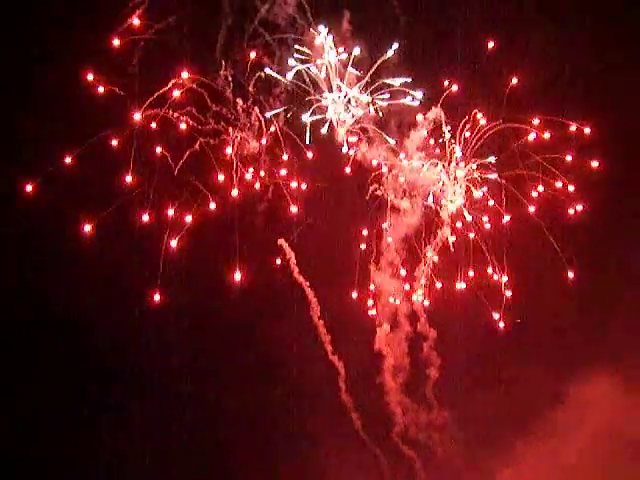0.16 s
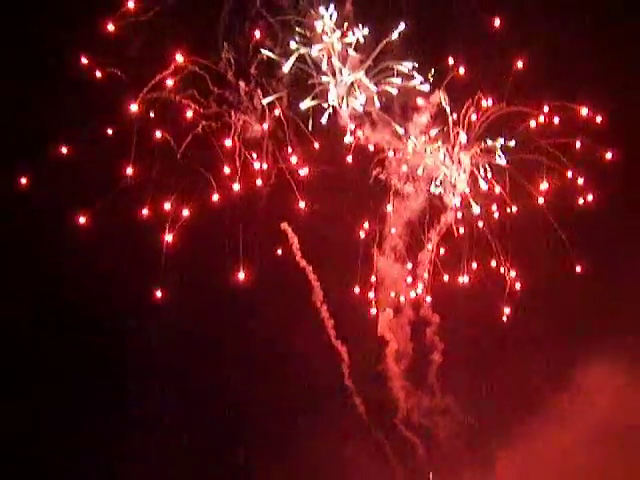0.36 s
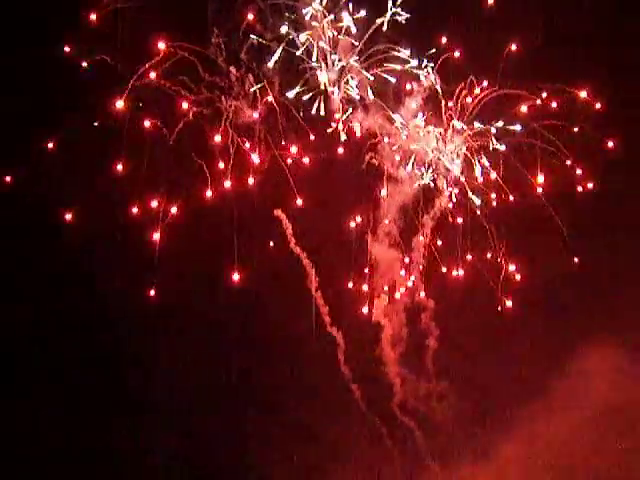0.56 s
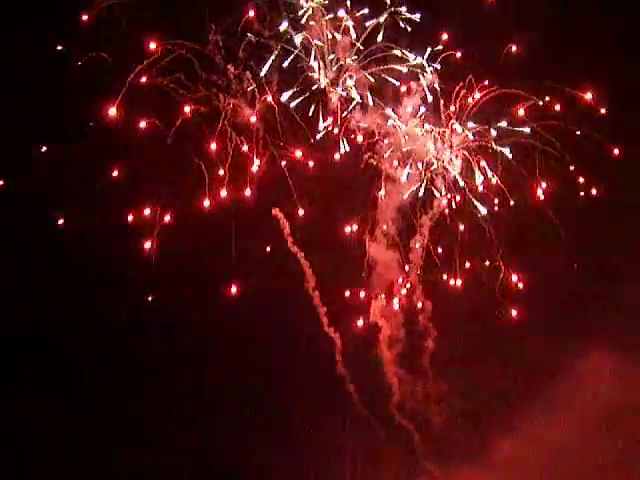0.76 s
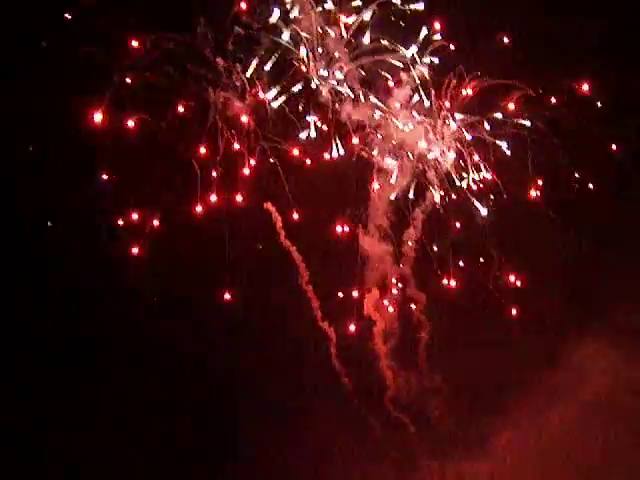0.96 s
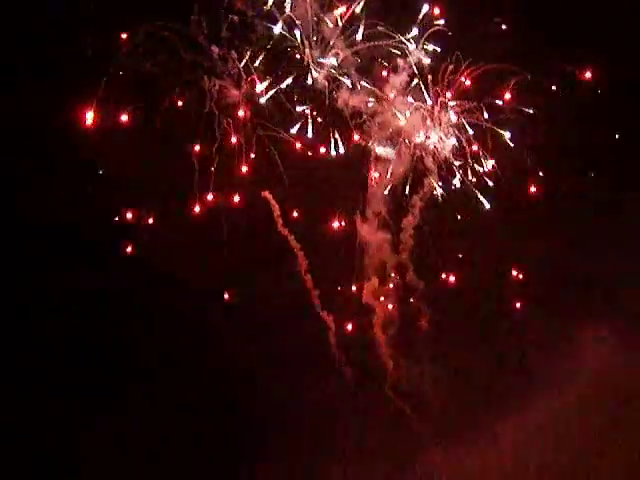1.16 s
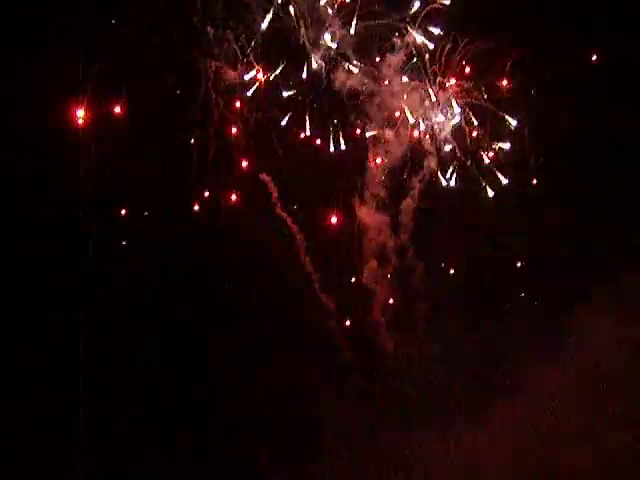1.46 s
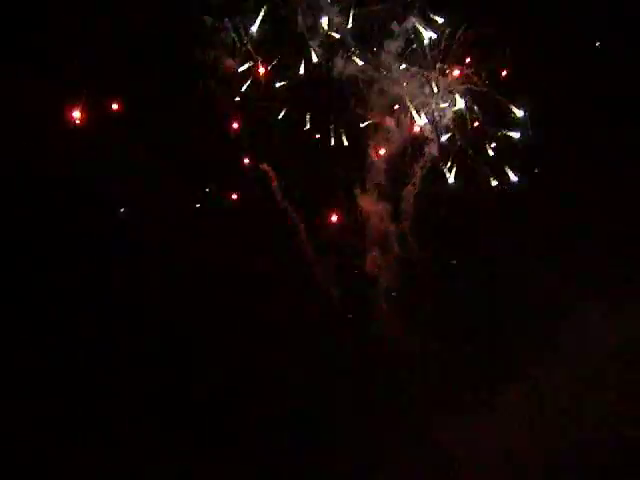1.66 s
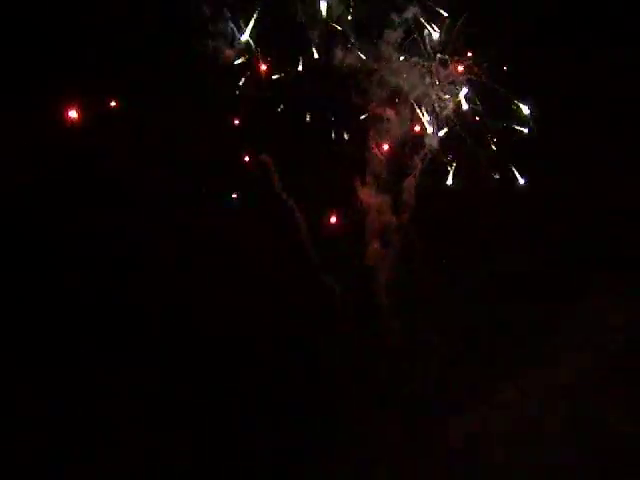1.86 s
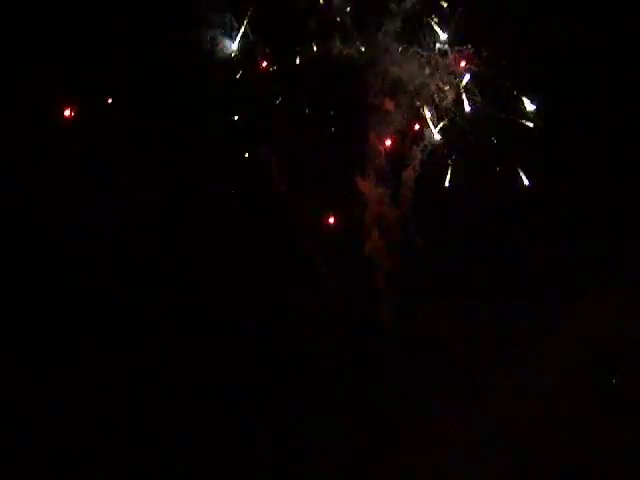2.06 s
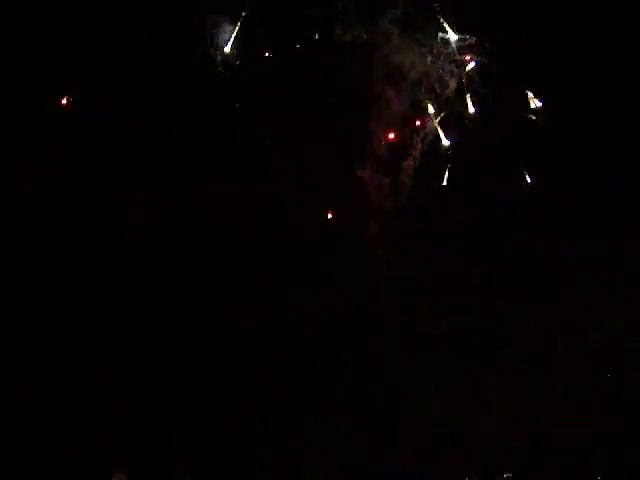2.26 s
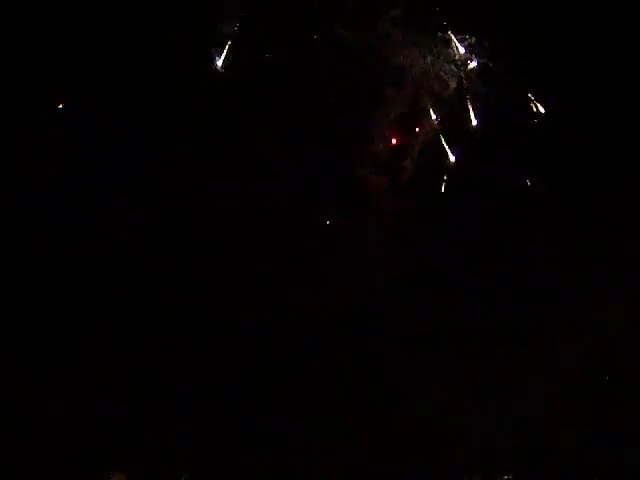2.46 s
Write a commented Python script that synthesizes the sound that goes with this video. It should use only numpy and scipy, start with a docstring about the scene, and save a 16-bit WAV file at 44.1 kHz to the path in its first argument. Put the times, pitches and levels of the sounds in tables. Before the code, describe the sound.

Fireworks crackle in sharp overlapping pops at night, with three deep booms, then fade to quiet.

```python
"""Small star charges of a firework pop overhead at night: each is a sudden push of air, then a ground bounce.
Three mortar lifts boom from the ground: a deep swing of pressure under a noisy crack, sent back by walls.
Faint noisy ticks, a low rumble and a far wash of reverberation, all shaped from noise, lie behind them.
A camera hears this through a dull port (left) and a bright one that whistles (right), and overloads."""
import sys
import numpy as np
from scipy import signal
from scipy.io import wavfile
from scipy.ndimage import uniform_filter1d

SR = 44100
rng = np.random.default_rng(int(sys.argv[2]) if len(sys.argv) > 2 else 0)


def put_to_file(sound):
    """Save the sound as 16-bit audio at rate SR, in the file named by the first command-line argument."""
    columns = np.atleast_2d(sound).T  # one column per channel
    safe = np.clip(columns, -1, 1)
    whole_steps = np.round(safe * 32767)
    wavfile.write(sys.argv[1], SR, whole_steps.astype(np.int16))


N = 114660  # length in samples


def amp(db):
    """Turns decibels into a plain multiplier."""
    return 10 ** (np.asarray(db) / 20)


def evened(x):
    """Brings a sound to an average (RMS) strength of 1."""
    return x / np.sqrt(np.mean(x ** 2) + 1e-20)


def read(points, hz):
    """Reads a curve of (pitch_hz, value) points, in straight lines over log pitch."""
    f, value = np.transpose(points)
    return np.interp(np.log(hz + 1), np.log(f + 1), value)


def add(mix, s, sound):
    """Adds a sound to the mix, starting at s seconds."""
    part = mix[round(s * SR):][:len(sound)]
    part += sound[:len(part)]


def coloured(x, points):
    """Filters with a gain curve, without any sound arriving early (minimum phase)."""
    log_gain = read(points, abs(np.fft.fftfreq(4096, 1 / SR))) * np.log(10) / 20
    response = np.exp(np.conj(signal.hilbert(log_gain)))
    taps = np.fft.ifft(response).real[:2048]
    return signal.oaconvolve(x, taps)[:N]


# How alike the background is at the two ports: pitch_hz, likeness (1 = the same)
PORT_LIKENESS = [(100, .98), (400, 1), (1000, 1), (2000, 0.17), (4000, 0.6)]


def murk(tone, level, size, patchy_db, flicker_db):
    """Shapes random short-time spectra with patches and flicker, partly shared by the two ports."""
    frames, hz = N * 4 // size + 5, np.fft.rfftfreq(size, 1 / SR)
    a, b, c, d, patches = rng.standard_normal((frames, len(hz), 5)).T
    patches = uniform_filter1d(patches, size=6, axis=0)
    patches = evened(uniform_filter1d(patches, size=8, axis=1))
    same = np.clip(read(PORT_LIKENESS, hz), -1, 1)[:, None]
    left = a + 1j * b
    right = same * left + np.sqrt(1 - same ** 2) * (c + 1j * d)
    flicker = flicker_db * rng.standard_normal(frames)
    gain = amp(read(tone, hz)[:, None] + patchy_db * patches + flicker)
    spectra = np.array([left, right]) * gain
    x = evened(signal.istft(spectra, nperseg=size, noverlap=size * 3 // 4)[1][:, :N])
    return x * amp(np.interp(np.arange(N) / SR, *np.transpose(level)))


# Loudness of the low rumble over time: time_s, level_db
RUMBLE_LEVEL = [(0, -45), (.36, -39), (.46, -28), (0.519, -22.5), (.6, -20.5), (.7, -26.5), (.9, -35.5),
                (1.0, -39), (1.172, -38.5), (1.36, -29.5), (1.458, -36.5), (1.831, -44), (1.92, -38),
                (2.02, -30), (2.07, -39.5), (2.13, -34), (2.22, -39), (2.27, -39.5), (2.43, -44.5),
                (2.48, -37), (2.6, -40.5)]
# Balance of pitches in the rumble: pitch_hz, relative_level_db
RUMBLE_TONE = [(10, -21), (20, -2.5), (35, -10.5), (60, -5), (95, -11), (125, -21.5), (200, -28)]


def rumble():
    """Low noise that swells, sinks and flickers, cut off steeply towards 300 Hz."""
    return murk(RUMBLE_TONE + [(300, -87)], RUMBLE_LEVEL, size=2048, patchy_db=0, flicker_db=5.5)


# Loudness of the far reverberation of the show: time_s, level_db
WASH_LEVEL = [(0.0, -39), (0.19, -40.5), (0.32, -35.5), (0.45, -36), (0.62, -33), (0.85, -42), (1.01, -33),
              (1.16, -37.5), (1.7, -43.5), (2.6, -45.5)]
# Balance of pitches in the far reverberation: pitch_hz, relative_level_db
WASH_TONE = [(100, -35.5), (200, 4), (400, -4.5), (900, -6.5), (1500, -13.5), (3000, -15), (5000, -15.5),
             (8000, -32)]


def wash():
    """Far reverberation of the show: a broad noise with slight patches and flicker."""
    return murk(WASH_TONE, WASH_LEVEL, size=256, patchy_db=1, flicker_db=1)


TAIL_DB = -22
# How long each pitch lingers in the surroundings: pitch_hz, t60_s (time to fall by 60 dB)
TAIL_T60 = [(150, 0.75), (600, 0.68), (2000, 0.75), (6000, 0.37)]


def surroundings(x):
    """Sparse reflections of random sign, each band dying at its own speed."""
    taps = np.zeros((2, SR // 2))
    jitter = rng.integers(0, 20, (2, (SR // 2 - 261) // 20))
    at = np.arange(260, SR // 2 - 20, 20) + jitter  # one reflection per 20 samples
    np.put_along_axis(taps, at, rng.choice([-1., 1.], at.shape), 1)
    taps[1] += 2.7 * taps[0]  # the right port shares the left port's reflections
    hz, t, z = signal.stft(taps, SR, nperseg=256)
    decay = amp(-60 * t / read(TAIL_T60, hz)[:, None])
    tail = signal.istft(z * decay, SR, nperseg=256)[1]
    tail /= np.linalg.norm(tail, axis=1, keepdims=True)
    return amp(TAIL_DB) * signal.fftconvolve(x[None], tail, axes=1)[:, :N]


# Distant echoes and faint ticks: start_s, level_db, brightness_hz, t60_s
TICKS = [(1.599, -30, 4500, 0.016), (1.752, -37.5, 978, 0.051), (1.885, -29, 910, 0.023),
         (1.894, -33.5, 3330, .03), (1.923, -37.5, 2600, 0.32), (1.955, -31.5, 2600, 0.042),
         (1.977, -41, 2770, .03), (2.004, -33, 2020, 0.014), (2.049, -23, 1570, 0.025),
         (2.052, -28.5, 4300, 0.024), (1.93, -38.5, 495, 0.45), (2.051, -33, 630, 0.12),
         (2.09, -36, 1800, 0.028), (2.271, -28.5, 5170, 0.025), (2.299, -45, 5150, 0.035)]


def ticks():
    """Smeared puffs of noise in a broad band, each rising fast and then dying away."""
    out, t = np.zeros(N), np.arange(3000) / SR
    for (s, db, hz, t60), noise in zip(TICKS, rng.standard_normal((len(TICKS), 3000))):
        sos = signal.butter(2, [hz / 1.6, hz * 1.3], "band", fs=SR, output="sos")
        band = evened(signal.sosfilt(sos, noise))
        rise = np.minimum(t / 0.00069, 1)
        add(out, s, amp(db - 60 * t / t60) * rise * band)
    return out


def shock(ms):
    """A sudden push of air, then a longer suction; ms is the length of the push."""
    u = np.arange(1500) / SR / (ms / 1000)
    return (1 - u) * np.exp(-u)


# Deep swing: DIP_S is its lowest point after the start; rise and fall are its widths before and after that
DIP_S, THUMP_RISE_S, THUMP_FALL_S = .0088, .0095, .0105
THUMP_SAG = 14  # per second: how quickly the swing slows down after the dip
CRACK_T60, LEAD_S, BEAT_HZ, BEAT_T60 = .025, .004, 960, .03  # times in seconds
SNAP_DB, SNAP_MS = 16.5, 0.067  # shock front, against the thump
# Mortar lifts: start_s, thump_db, thump_hz, crack_db, beat_db, lead_in_hiss_db
BOOMS = [(.4130, -.8, 64, -2, -9, -15), (.4406, -.3, 64, -5, -10, -13), (.5279, 1.8, 61, -2, -11, -9)]
# Returns from the surroundings: delay_s, thump_db, crack_db (both against the first sound)
ECHOES = [(.164, -19.5, -47), (0.226, -21.5, -48)]


def booms():
    """One deep swing of pressure under a ragged crack with a 960 Hz tone; a hiss leads in, walls answer."""
    thumps, cracks, t = np.zeros(N), np.zeros(N), np.arange(-1500, 3000) / SR
    grit = rng.standard_normal((len(BOOMS), len(t)))
    u, after = t - DIP_S, np.maximum(t, 0)
    fade_in = np.clip(1 + t / .005, 0, 1) ** 2
    swell = np.exp(-(u / np.where(u < 0, THUMP_RISE_S, THUMP_FALL_S)) ** 2) * fade_in
    for (s, db, hz, crack_db, beat_db, lead_db), noise in zip(BOOMS, grit):
        turns = hz * u * np.exp(-THUMP_SAG * np.maximum(u, 0))
        thump = -amp(db) * swell * np.cos(2 * np.pi * turns)
        lead_in = amp(lead_db) * np.exp(np.minimum(t, 0) / LEAD_S)
        fading = amp(crack_db - 60 * t / CRACK_T60)
        beat = amp(beat_db - 60 * after / BEAT_T60) * np.sin(2 * np.pi * BEAT_HZ * after)
        crack = np.where(t < 0, lead_in, fading) * noise + beat
        add(cracks, s, amp(db + SNAP_DB) * shock(SNAP_MS))
        for delay, thump_db, echo_db in [(0, 0, 0.015)] + ECHOES:  # the first is the direct sound
            add(thumps, s + t[0] + delay, amp(thump_db) * thump)
            add(cracks, s + t[0] + delay, amp(echo_db) * crack)
    return thumps, cracks


RING_GRIT, RING_SPREAD = 1, 0.1  # roughness of the whistle; largest detuning as a share of its pitch
# Whistling cavity of the bright port: pitch_hz, relative_level_db, t60_s
WHISTLES = [(4710, -1, 0.0053), (7360, -30.5, 0.061)]


def ring(db, noise):
    """The cavity of the bright port whistles briefly, roughened by noise and randomly detuned."""
    t = np.arange(len(noise)) / SR
    detune = 1 + RING_SPREAD * np.tanh(noise[0])
    grit = evened(uniform_filter1d(noise, size=12))
    tone = sum(amp(mode_db - 60 * t / t60) * np.sin(2 * np.pi * hz * detune * t)
               for hz, mode_db, t60 in WHISTLES)
    return amp(db) * np.minimum(t / 0.00013, 1) * tone * (1 + RING_GRIT * grit)


BOUNCE_STRETCH, NEAR_STRETCH = 0.95, 1.09  # push length of the bounce and near copies, against the shock
GROUND_HZ, GROUND_T60, GROUND_DB = 347, 0.011, -4.5  # the ground swings after a bounce; t60 in seconds
PUFF_DB, PUFF_T60 = -7.5, 0.02  # noise before smoothing, against strength_db; t60 in seconds
# Star charges: start_s, strength_db (the direct shock is 10.5 dB above it), push_ms, port_ring_db,
# bounce_delay_ms, bounce_db (against strength_db), bounce_ring_db
POPS = [(0.1516, -3, 0.25, 4, 5.54, 5.5, -26), (0.1948, -9, 0.44, -29, 5.03, 8.5, -6.5),
        (0.251, -5.5, 0.58, 6, 5.7, 6.5, -2), (0.3091, -8, 0.43, -28, 6.44, 7.5, -12),
        (0.3576, -4.5, 0.31, -9, 6.05, 9.1, 1.5), (0.3795, -10.5, 0.43, -25, 6.3, 4.5, -3),
        (0.6016, -12.5, 0.34, -13.5, 6.76, 8.8, -6), (0.6259, -12.5, 0.3, -51, 6.06, 9.5, -35),
        (0.6429, -14, 0.66, -52, 6.23, 9.9, -49), (0.7617, -6.5, 0.23, -0.5, 6.4, 8.1, -21),
        (0.8044, -1, 0.23, -26, 5.4, 8.5, -21), (0.8075, 1, 0.26, -22.9, 5.34, 0, -5),
        (0.8263, -3, 0.17, -8, 5.45, 8.5, -1), (0.8455, -11.5, 0.54, -3.5, 5.3, 11.5, -4),
        (0.8581, -0.5, 0.18, -13.8, 5.3, 4, -6.5), (0.8701, -22, 0.48, -8.5, 5, 18, -7),
        (0.8845, -20.5, 0.95, -24, 6.3, 8.5, -23), (0.9456, -5, 0.2, -2, 9.1, 5.5, -25),
        (0.9479, -4.5, 0.32, -15, 5.16, 5, -6.5), (0.9696, -9, 0.48, -12, 6.9, 11.5, -7),
        (1.0063, -4.5, 0.25, -6, 6.1, 7.7, 0), (1.029, -19.5, 0.99, -38, 6.3, 5, -42),
        (1.1073, -1.5, 0.12, 2.5, 5.34, 6.5, -33), (1.1075, -13, 0.78, -39, 6.4, 14.5, -23),
        (1.1274, -14, 0.25, -35, 4.4, 9.5, -16), (1.1619, -0.5, 0.13, 5.5, 6.6, 2.5, 1),
        (1.168, -13.5, 0.45, -3, 5.45, 14, -1.5), (1.2, -6.5, 0.21, -26, 5.25, 5.5, -27),
        (1.378, -9, 0.31, -8.5, 7, 5.5, -32), (1.4396, -6, 0.21, 1, 6.16, 6.7, 2),
        (1.5381, -5.5, 0.29, -3.5, 5, 8.5, -3)]
# Weaker copies close behind each shock: delay_ms, level_db (5 dB is added, against strength_db)
NEAR_COPIES = [(2.35, -6), (4.3, -14)]


def pops():
    """Shocks and ground bounces, each with a short diffuse puff of random noise; also the bright port's ring."""
    air, port, t = np.zeros(N), np.zeros(N), np.arange(1500) / SR
    swing = -amp(GROUND_DB - 60 * t / GROUND_T60) * np.sin(2 * np.pi * GROUND_HZ * t - 1.5)
    swing *= np.minimum(t / 0.0014, 1)
    grit = rng.standard_normal((len(POPS), 2, 2000))
    for (s, db, push_ms, ring_db, delay_ms, bounce_db, bounce_ring_db), noise in zip(POPS, grit):
        bounce_s = s + delay_ms / 1000
        add(air, s, amp(db + 10.5) * shock(push_ms))
        smooth = uniform_filter1d(noise[:, :len(t)], size=4, axis=1)
        puff = amp(db + PUFF_DB - 60 * t / PUFF_T60) * smooth
        add(air, s + .0005, puff[0])
        add(air, bounce_s + .0005, amp(bounce_db) * puff[1])
        for near_ms, near_db in NEAR_COPIES:
            add(air, s + near_ms / 1000, amp(db + 5 + near_db) * shock(push_ms * NEAR_STRETCH))
        add(air, bounce_s, amp(db + bounce_db) * (shock(push_ms * BOUNCE_STRETCH) + swing))
        add(port, s, ring(ring_db, noise[0]))
        add(port, bounce_s, ring(bounce_ring_db, noise[1]))
    return air, port


RATTLE_DB = np.array([[-12.5], [-26.5]])  # left and right hiss, against the thump


def rattle(thumps):
    """The housing hisses while a thump shakes it."""
    return amp(RATTLE_DB) * abs(thumps) * rng.standard_normal((2, N))


def scene():
    """Adds all sounds at the two ports, left dull and right bright, before the ports colour them."""
    air, port = pops()
    thumps, cracks = booms()
    sharp = air + cracks
    out = sharp + thumps + ticks() + surroundings(sharp)
    out[1] += port
    return out + rattle(thumps) + rumble() + wash()


LAG_MS = .07  # the dull port hears slightly late
HISS_DB = -64.5  # of the microphone circuits
CEILING_DB, KNEE = -0.5, 7.2  # overload ceiling; a higher knee bends more sharply
EDGE_HZ = 16100  # final treble limit
# Colour of the dull port: pitch_hz, gain_db
DULL_PORT = [(100, 2), (700, 2.5), (1100, 5.5), (1400, 1), (1800, -6), (2400, -6), (3000, -16), (4000, -23),
             (9000, -25)]
# Colour of the bright port: pitch_hz, gain_db
BRIGHT_PORT = [(100, 1.5), (1000, 3.5), (1400, 1.5), (1800, 2.5), (2500, 4.5), (4100, 2), (4650, 5),
               (5300, -5.5), (6000, -10.5), (9000, -19.5)]
# Band limit of the camera: pitch_hz, gain_db
BAND_LIMIT = [(7800, 0), (8300, -5), (8800, -45.5), (16000, -88.5)]


def record(dry):
    """Port colours, lag, hiss, soft overload, band limit, clipping at full scale, then a last treble limit."""
    late = np.interp(np.arange(N) - LAG_MS * SR / 1000, np.arange(N), dry[0])
    x = np.array([coloured(late, DULL_PORT), coloured(dry[1], BRIGHT_PORT)])
    x = (x + amp(HISS_DB) * rng.standard_normal(x.shape)) / amp(CEILING_DB)
    x = amp(CEILING_DB) * x / (1 + abs(x) ** KNEE) ** (1 / KNEE)
    x = np.clip([coloured(channel, BAND_LIMIT) for channel in x], -1, 1)
    treble_limit = signal.firwin(255, EDGE_HZ, window=("kaiser", 9), fs=SR)
    return signal.oaconvolve(x, treble_limit[None], "same")


dry = scene()
out = record(dry)
put_to_file(out)
```